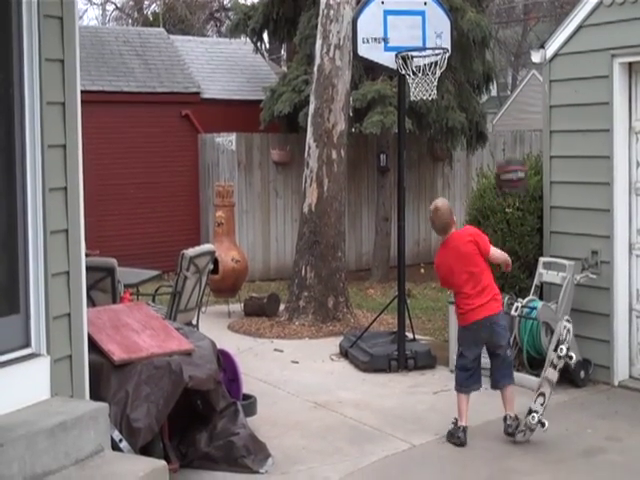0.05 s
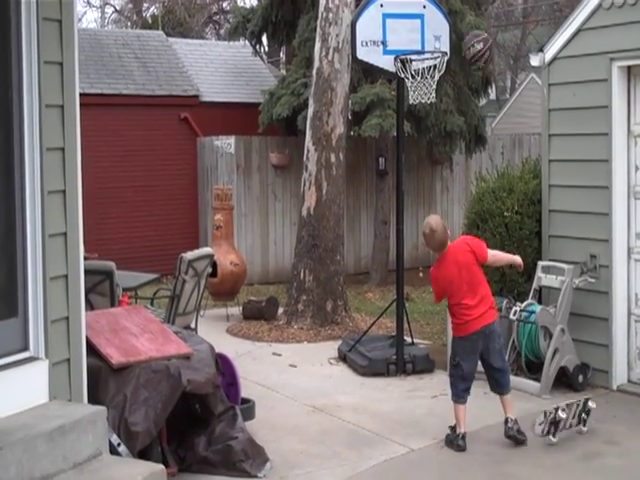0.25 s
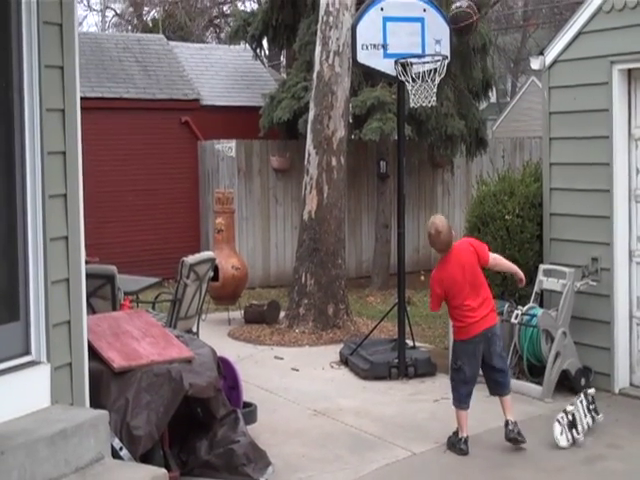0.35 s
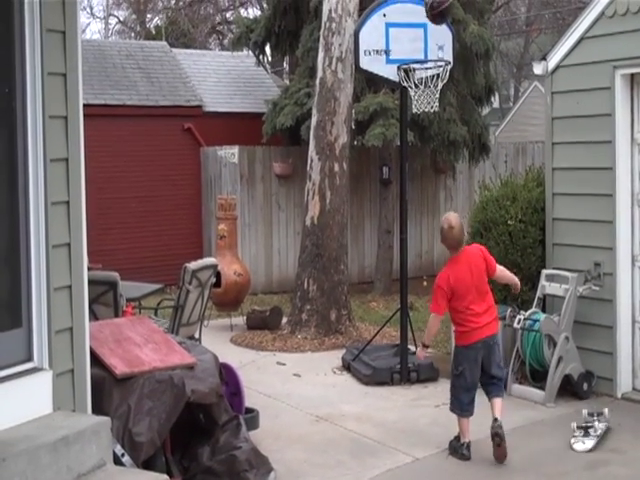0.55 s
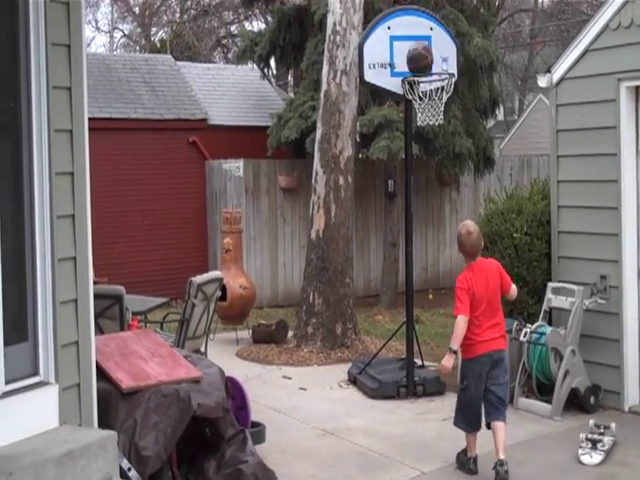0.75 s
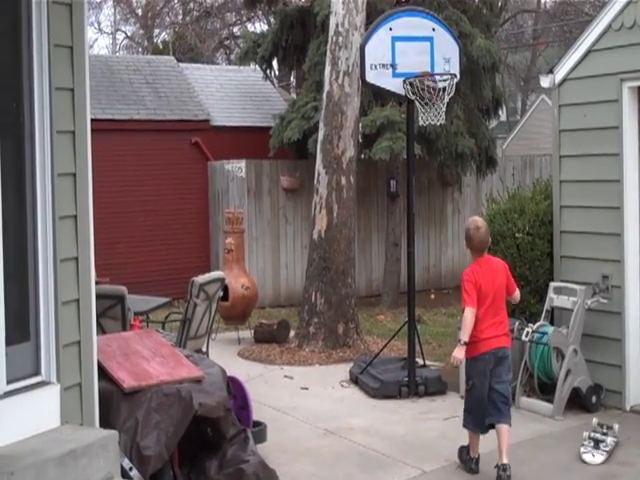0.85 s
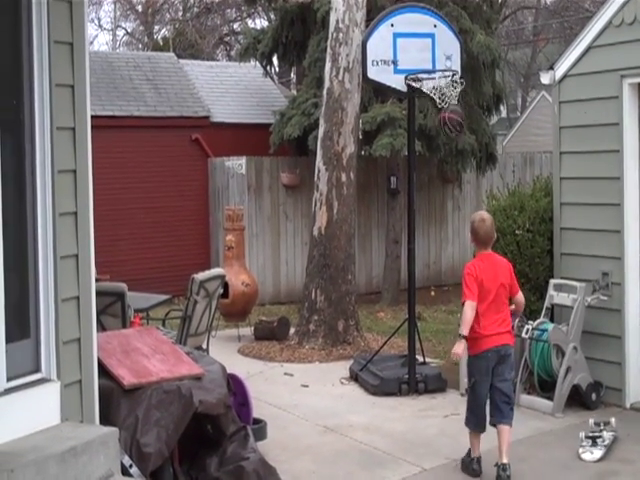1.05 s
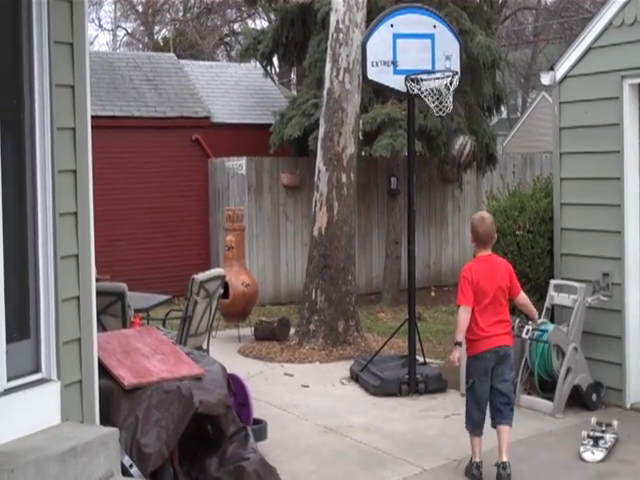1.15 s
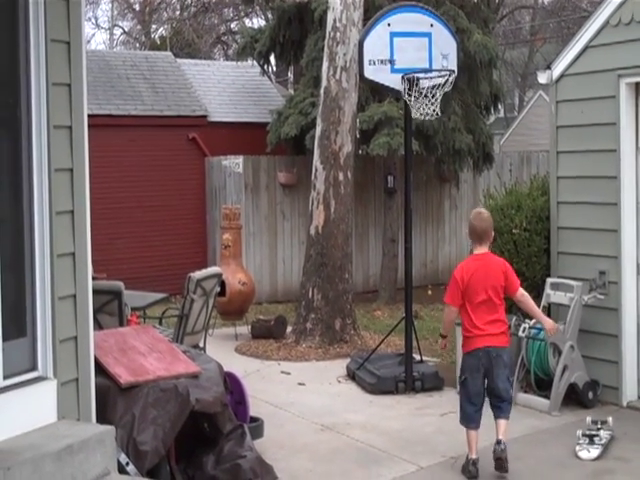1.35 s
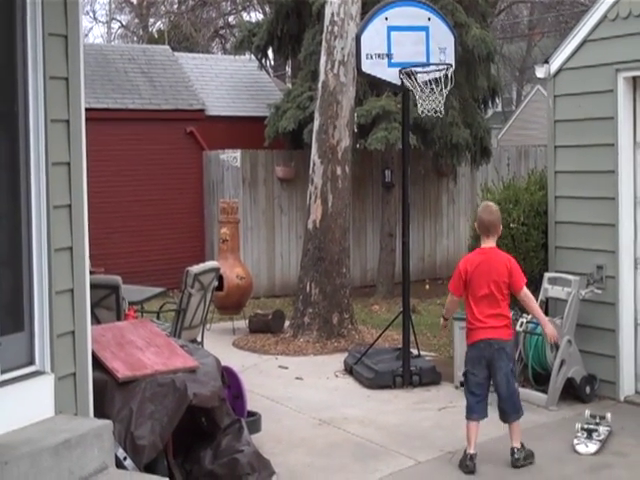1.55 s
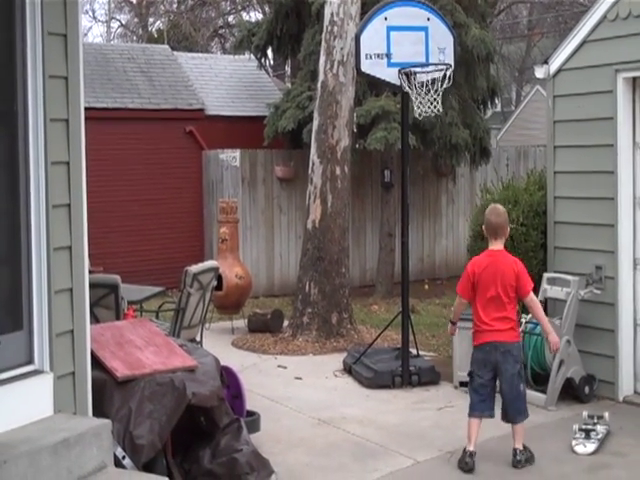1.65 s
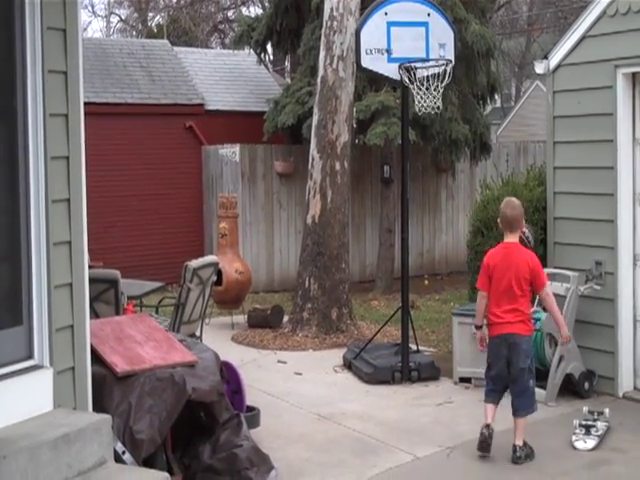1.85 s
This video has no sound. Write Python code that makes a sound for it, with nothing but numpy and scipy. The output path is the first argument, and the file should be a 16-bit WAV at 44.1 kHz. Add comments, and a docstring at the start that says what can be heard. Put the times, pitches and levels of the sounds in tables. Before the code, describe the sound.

Skateboard clattering to rest outdoors, followed by a basketball hitting a hoop and bouncing.

```python
"""A skateboard tips over and clatters to rest on a concrete patio, its wooden deck ringing at each blow.
A basketball hits a portable hoop, which rattles and booms; the ball brushes the net and bounces once
on the slab, the air inside it pinging. House walls and a fence throw the blows back to the microphone,
over a quiet outdoor hush."""
import sys
import numpy as np
from scipy import signal
from scipy.fft import rfft, irfft, next_fast_len
from scipy.io import wavfile
from scipy.ndimage import uniform_filter1d

SR = 44100
rng = np.random.default_rng(int(sys.argv[2]) if len(sys.argv) > 2 else 0)


def transcribe(u):
    """Save the signal u as a 16-bit wav file named by the first command-line argument.

    u: samples, shape (n,) or (channels, n), limited to [-1, 1]; the rate is SR.
    q: integer samples, one column per channel.
    """
    v = np.clip(np.atleast_2d(u).T, -1, 1)
    q = np.round(v * 32767).astype(np.int16)
    wavfile.write(sys.argv[1], SR, q)


N = 83790
BLOW_SAMPLES = 32768  # room for one blow and its echo

# Bright spectrum of grit and net. Each row: frequency in Hz, gain in dB.
SCUFF_COLOUR = [(100, -46), (700, 9.5), (1700, 4), (3000, 1.5), (6000, -1), (9000, -5), (13500, -19.5)]


def skateboard():
    """The deck clatters on the slab; trucks, wheels and deck add short, damped knocks."""
    # Landings, the spectrum of their crack and the deck's modes; rows as blows() lists them.
    landings = [(0.0, -14, -3.5, -11.5, 0.00033, 0.03, -13, 6.5),
                (.1957, -5.5, 4, -7, .002, 0.0026, -4, -1), (.2045, -5.5, 0, 1, 0.0016, 0.0056, -7, 0.5),
                (.2697, 8.5, -2.5, 5, 0.00081, 0.00296, -9, -2),
                (.2768, 3, 4.5, 1, 0.00061, 0.0051, -13, -1), (.348, -7, -1, 5, .001, 0.0066, 2.5, -1.5),
                (.3563, -6, -4, 6.5, 0.00098, 0.0013, -4.5, -2.5),
                (.4535, -2.5, -5, -7, 0.005, 0.0066, -12, 1), (.463, -17, 2.5, 2.5, 0.0009, 0.0046, 5, 1.5),
                (.5442, -13.5, 5, 2, 0.00078, 0.0073, -3.5, -0.5),
                (.6956, -18.5, 0.5, 1, .0004, 0.0027, -6, 2)]
    crack_colour = [(30, -43), (110, -35), (190, -16.5), (330, -5.5), (520, -4.5), (850, 1.5), (1450, 1.5),
                    (1950, 0), (2500, -4.5), (3000, -6), (4000, -9), (5500, -8.5), (9000, -14.5),
                    (13500, -26.5)]
    deck_modes = [(327, -12.5, 0.16), (656, 0.5, 0.14), (763, -4, 0.75), (880, -1.5, 0.11), (949, 5, 0.214),
                  (1029, 9, 0.067), (1406, 4.5, 0.089), (1357, 3, 0.26), (1730, -23, .18),
                  (1845, -19, 0.49), (2030, -2, .16), (2400, -13.5, .13), (5258, -14.5, 0.1055),
                  (7260, -21.5, .14)]
    # Each row: centre in seconds, pitch in Hz, half-width in seconds, level in dB, echo in dB.
    knocks = [(.2724, 1900, .0011, 11.5, -9), (.273, 60, .0028, -14, -30), (.273, 170, .0017, -12, -18),
              (.3576, 760, .0012, -5, -7), (.546, 5300, .0005, -24, -4), (.6972, 5800, .0002, -23, -6)]
    out = blows(landings, crack_colour, deck_modes)
    for centre, hz, width, db, echo_db in knocks:
        t = clock(N) - centre
        knock = unit(np.exp(-.5 * (t / width) ** 2) * np.sin(2 * np.pi * hz * t))
        out += undb(db) * yard(knock, echo_db)
    return out


def hoop():
    """Backboard and rim rattle, steel rings on, the net swishes, the stand booms; a soft thud follows."""
    # Blows on backboard and rim, their spectrum and the hoop's modes; rows as blows() lists them.
    hits = [(.792, -20, -4, -16, 0.0016, .01, -6, -17), (.813, -18, 5, 2.5, 0.0015, 0.049, 4, 7),
            (.870, -3.5, -4, -1, .012, 0.004, -10.5, 5), (.898, -14.5, -4, 0.5, 0.0013, 0.018, -17, 6.5),
            (.951, -9, -8.5, -2, 0.0042, 0.0166, -4.5, 5), (1.137, -14.5, -3.5, 1, 0.0056, 0.0073, 3, 1.5),
            (1.2205, -14.5, -7, -1, 0.0061, 0.0087, 1.5, 0), (1.335, -34, 0, 10, 0.0026, .01, -12, 2),
            (1.482, -24.5, -13, 3, 0.0025, 0.0063, -6.5, -2.5)]
    crack_colour = [(60, -30.5), (180, -19.5), (330, 3.5), (520, -9.5), (690, -7.5), (850, 3), (1010, -4),
                    (1200, 3), (1500, -6), (2000, -7), (3500, -14.5), (7000, -16), (13000, -35)]
    hoop_modes = [(321, -11.5, 0.36), (338, -5, .22), (440, -9, 0.6), (662, -6.5, 0.21), (805, 2.5, 0.55),
                  (855, 9.5, 0.17), (859, 1, 0.19), (898, 7.5, 0.12), (875, -3, 0.095), (1000, -25, 0.17),
                  (1115, 9, 0.17), (1247, -4, 0.16), (1230, -10.5, 0.75), (1850, -17, 0.45)]
    # Pole and rim. Each row: start in seconds, pitch in Hz, level in dB, t60 in seconds.
    steel_tones = [(.885, 224.9, -14.5, 1), (1.03, 2185, -25.5, 1), (1.139, 820, -24, .25),
                   (1.222, 812, -19.5, 0.23), (1.222, 893, -16, 0.22), (1.483, 885, -26, .15)]
    # Brushes of the net; low booms of the stand, then a soft low thud, perhaps a footstep.
    # Each row: centre in seconds, half-width in seconds, level in dB.
    net_brushes = [(.828, 0.017, -51.5), (.927, .012, -49), (1.128, 0.022, -53.5)]
    low_swells = [(.90, 0.042, -74), (1.08, 0.077, -57.5), (1.60, 0.035, -56.5), (1.87, 0.018, -61)]
    # Spectrum of booms and thud. Each row: frequency in Hz, gain in dB.
    low_colour = [(20, -27), (60, 6), (100, 5.5), (160, 8), (260, -2.5), (800, -36), (8000, -75)]
    attack = 1 - fade(0.049)
    steel = sum(undb(db) * delay(unit(attack * fade(t60) * np.sin(2 * np.pi * hz * clock())), start)
                for start, hz, db, t60 in steel_tones)
    rattle = blows(hits, crack_colour, hoop_modes)
    net = swells(net_brushes) * noise(SCUFF_COLOUR)
    booms_and_thud = swells(low_swells) * noise(low_colour)
    return rattle + steel + net + booms_and_thud


def basketball():
    """The skin slaps the slab, the shell flutters, the air inside pings and the flattening ball thumps."""
    # Spectra of slap and thump. Each row: frequency in Hz, gain in dB.
    slap_colour = [(60, -28.5), (200, -18.5), (480, -16.5), (680, -7.5), (1100, 3.5), (1900, -1),
                   (2700, -3.5), (3300, -10), (4200, -7.5), (6000, -10.5), (8500, -17.5), (13000, -38.5)]
    thump_colour = [(30, -24), (80, -25), (150, -10), (280, 0), (400, -5), (520, -20), (2000, -45)]
    # The air in the ball. Each row: pitch in Hz, level in dB, t60 in seconds.
    air_modes = [(1058, 6, .3), (1133, -5, .17), (1180, -21, 0.38), (1364, -5, 0.25), (1666, -6.5, 0.066),
                 (1650, -35.5, 0.23), (2072, 19, 0.043), (2420, -18, .4), (2860, -23, 0.12),
                 (3690, -1, 0.14), (5530, -1.5, 0.083)]
    bounce_s, thump_lag_s, thump_contact_s = 1.5387, 0.0025, 0.0004
    skin = crunch(contact_s=.0017)
    shell = undb(-1) * crunch(contact_s=0.0033, rise_s=0.0011)
    slap = unit(colour(skin + shell, slap_colour)) + undb(-13) * ring(air_modes)
    thump = unit(colour(np.exp(-clock() / thump_contact_s), thump_colour))
    return (undb(2.5) * delay(yard(slap, echo_db=0.5), bounce_s)
            + undb(-6.5) * delay(yard(thump, echo_db=-3), bounce_s + thump_lag_s))


def grit():
    """Wheels and shoes make small bright ticks on the concrete."""
    # Each row: start in seconds, level in dB, echo in dB.
    ticks = [(0.0518, -31.5, 10.5), (.0602, -22, 7.5), (0.0703, -25.5, 5.5), (0.084, -31.5, 3),
             (.1455, -31.5, 3), (0.154, -31, 5.5), (.449, -18.5, 2.5), (0.7872, -21.5, -9), (1.3, -32, -4)]
    out = np.zeros(N)
    for start, db, echo_db in ticks:
        tick = unit(colour(crunch(contact_s=0.0016), SCUFF_COLOUR))
        out += undb(db) * delay(yard(tick, echo_db), start)
    return out


def blows(hits, crack_colour, modes):
    """Each blow cracks, rings the object and echoes round the yard."""
    # Each hit: start in seconds; level, treble and bass in dB; rise and contact in seconds;
    # ring and echo in dB. Each colour row: frequency in Hz, gain in dB.
    # Each mode: pitch in Hz, level in dB, t60 in seconds.
    out = np.zeros(N)
    for start, db, treble_db, bass_db, rise, contact, ring_db, echo_db in hits:
        crack = unit(colour(crunch(contact, rise), crack_colour))
        build_up = 1 - np.exp(-clock() / (rise + contact / 2))
        ringing = undb(ring_db) * ring(modes) * build_up
        blow = colour(crack + ringing, [(300, bass_db), (900, 0), (4500, treble_db)])
        out += undb(db) * delay(yard(blow, echo_db), start)
    return out


def crunch(contact_s, rise_s=1e-4, size=8192):
    """A rough contact: a burst of micro-impacts that builds and dies fast, with an even spectrum."""
    t = clock(size)
    envelope = (1 - np.exp(-t / rise_s)) * np.exp(-np.minimum(t / contact_s, 50))
    burst = rng.standard_normal(size) * envelope
    for _ in range(2):  # flatten the spectrum, then restore the envelope
        even = irfft(np.exp(1j * np.angle(rfft(burst))))
        local_rms = np.sqrt(np.abs(uniform_filter1d(even ** 2, size=65)) + 1e-14)
        burst = envelope * even / local_rms
    return delay(unit(burst), 0, BLOW_SAMPLES)


def ring(modes, spread_db=1.5):
    """Decaying modes, excited a little differently by each blow."""
    out = np.zeros(BLOW_SAMPLES)
    for hz, db, t60 in modes:
        gain = undb(db + spread_db * rng.standard_normal())
        out += gain * unit(fade(t60) * np.sin(2 * np.pi * (hz * clock() + rng.random())))
    return unit(out)


def yard(direct, echo_db):
    """The microphone hears the direct sound, slaps off rough walls, furniture scatter and a tail."""
    # Nearby walls. Each row: delay in seconds, level in dB.
    walls = [(.0052, -18.5), (0.01, -23), (.0128, -23), (0.0184, -13.5), (0.037, -21.5), (0.048, -20),
             (.054, -22.5)]
    # Diffuse echo. Each row: band centre in Hz, level in dB, t60 in seconds.
    tail_bands = [(70, -27, .4), (150, -3, 0.24), (302, -6, .45), (1000, -8.5, 0.42), (2580, -4, 0.41),
                  (6000, -8, 0.44), (13000, -5, 0.45)]
    slaps = sum(undb(db) * delay(crunch(contact_s=0.00048, size=512), lag, BLOW_SAMPLES)
                for lag, db in walls)
    hiss_spectrum = rfft(rng.standard_normal(BLOW_SAMPLES))
    log_hz, log_centres = log_bins(BLOW_SAMPLES // 2), np.log([row[0] for row in tail_bands])
    scatter = undb(-7) * unit(rng.standard_normal(BLOW_SAMPLES) * fade(t60=0.062))
    tail = np.zeros(BLOW_SAMPLES)
    for share, (_, db, t60) in zip(np.eye(len(tail_bands)), tail_bands):
        band = irfft(hiss_spectrum * np.interp(log_hz, log_centres, share))
        tail += undb(db) * band * unit(fade(t60))
    echo = slaps + delay(scatter + tail, seconds=.005, size=BLOW_SAMPLES)
    return direct + undb(echo_db) * signal.fftconvolve(direct, echo)[:len(direct)]


def outdoors():
    """A quiet, distant hush and one faint swell of very low rumble."""
    # Spectra of hush and rumble. Each row: frequency in Hz, gain in dB.
    hush_colour = [(20, 9), (50, -19), (150, -1), (350, -10.5), (900, 2.5), (1600, -5), (3000, -11.5),
                   (7000, -18), (13000, -30.5)]
    rumble_colour = [(15, 0), (45, -4), (90, -13), (200, -28), (2000, -70)]
    # Each row: centre in seconds, half-width in seconds, level in dB.
    rumble_swells = [(.83, .09, -62)]
    return undb(-60) * noise(hush_colour) + swells(rumble_swells) * noise(rumble_colour)


def swells(rows):
    """Bell-shaped rises and falls of level."""
    return sum(undb(db) * np.exp(-.5 * ((clock(N) - centre) / width) ** 2) for centre, width, db in rows)


def noise(points):
    """Coloured noise with an rms of one."""
    return unit(colour(rng.standard_normal(N), points)) * np.sqrt(N)


def colour(x, points):
    """Causal filter through (Hz, dB) points joined on a log-frequency axis."""
    hz, db = np.array(points).T
    size = next_fast_len(len(x), True)
    gain = undb(np.interp(log_bins(size), np.log(hz), db))
    cepstrum = irfft(np.log(gain))[:size]
    cepstrum[1:] *= 2  # minimum phase: nothing sounds ahead of a blow
    response = np.exp(rfft(cepstrum, 2 * size))
    return irfft(rfft(x, 2 * size) * response)[:len(x)]


def log_bins(size):
    """Log frequency of each bin of an FFT 2 * size long."""
    return np.log(np.arange(size + 1) * SR / (2 * size) + 1)


def delay(x, seconds, size=N):
    """Start a sound later, in a buffer of the given size."""
    return np.concatenate([np.zeros(int(seconds * SR)), x, np.zeros(size)])[:size]


def fade(t60):
    """Fall by 60 dB in t60 seconds."""
    return np.exp(-np.log(1000) * clock() / t60)


def unit(x):
    """Scale to an energy of one."""
    return x / np.sqrt(np.sum(x ** 2))


def clock(size=BLOW_SAMPLES):
    return np.arange(size) / SR


def undb(db):
    return 10 ** (np.asarray(db) / 20)


def scene():
    """The patio from one microphone, in mono."""
    return (skateboard() + grit() + hoop() + basketball() + outdoors())[None]


def record(dry):
    """The camera cuts the top of the treble."""
    top_hz = 13500
    return signal.sosfilt(signal.ellip(10, .2, 80, top_hz, fs=SR, output="sos"), dry)


dry = scene()
out = record(dry)
transcribe(out)
```